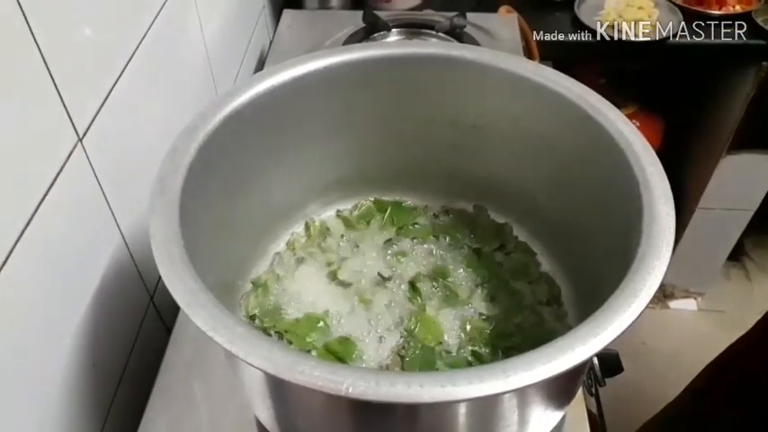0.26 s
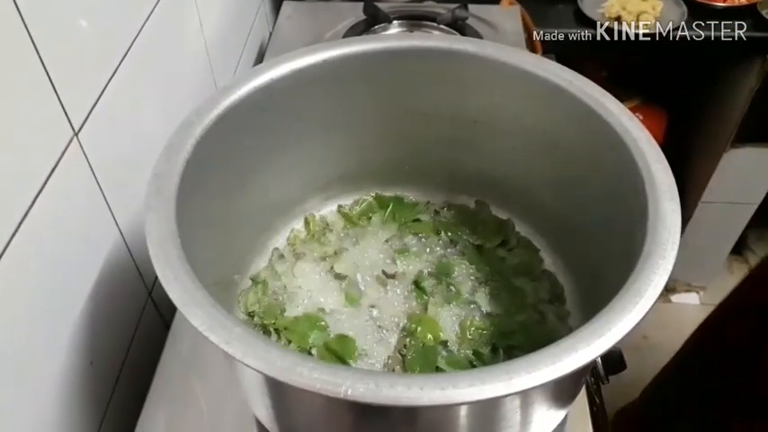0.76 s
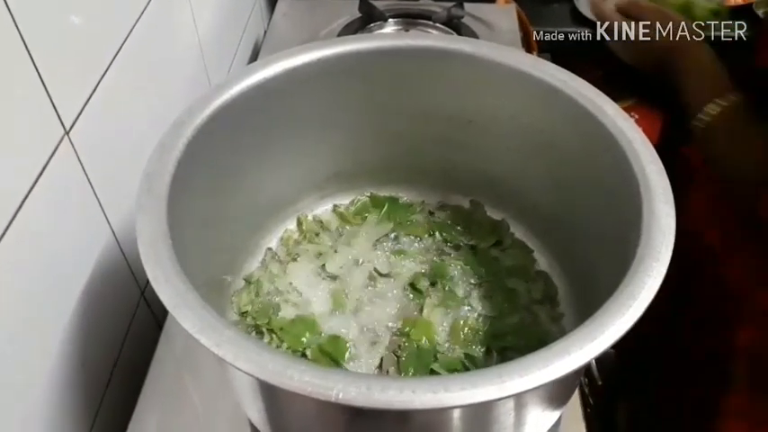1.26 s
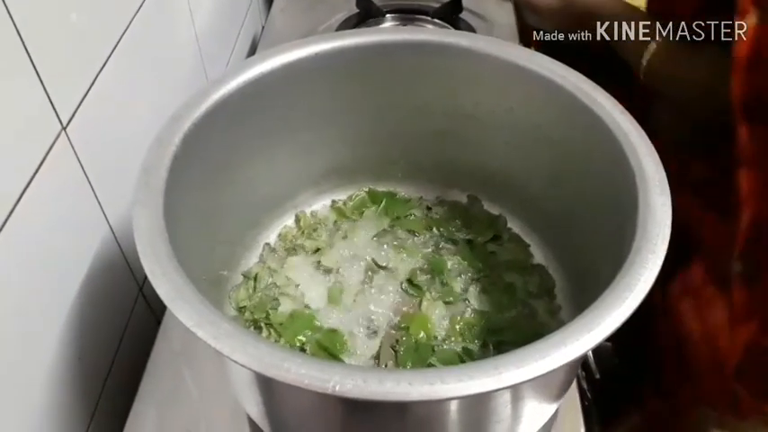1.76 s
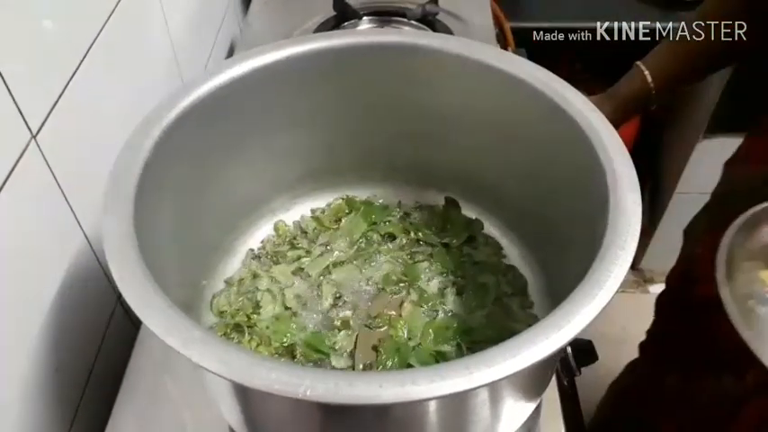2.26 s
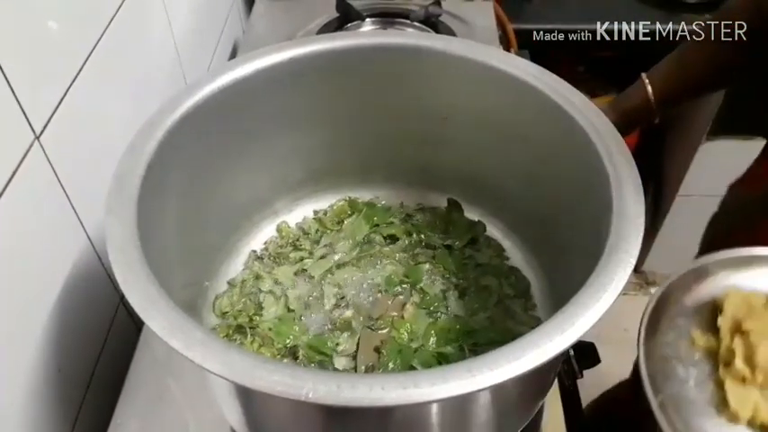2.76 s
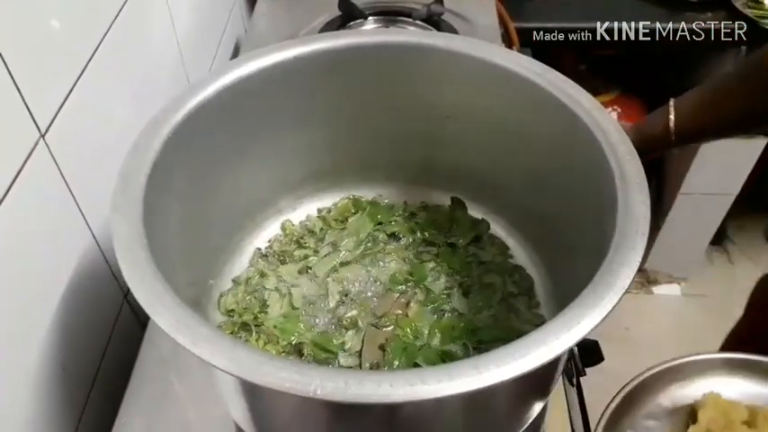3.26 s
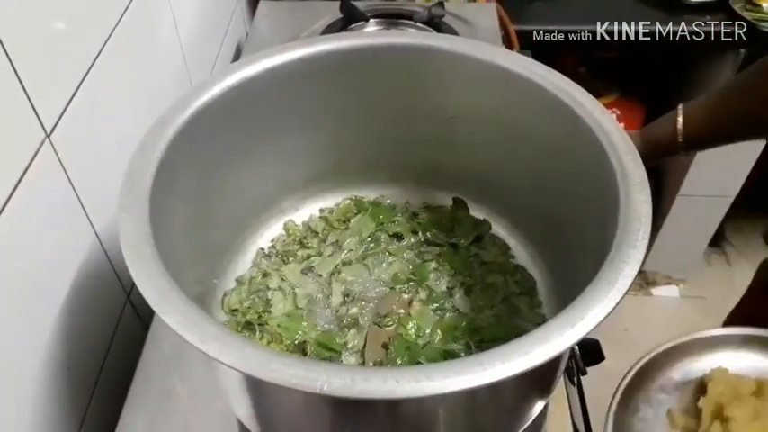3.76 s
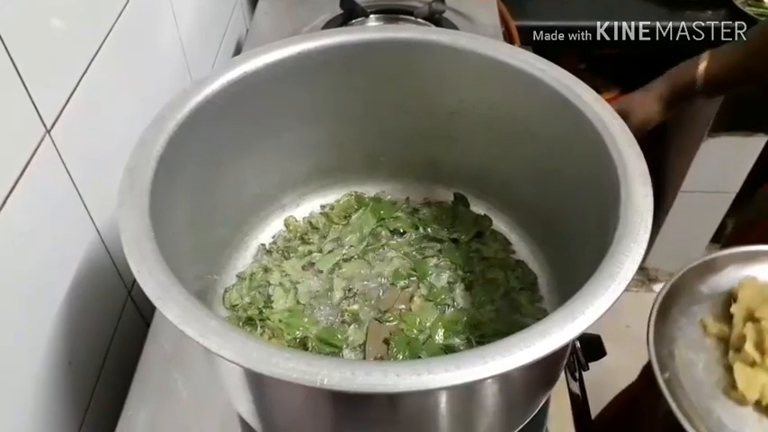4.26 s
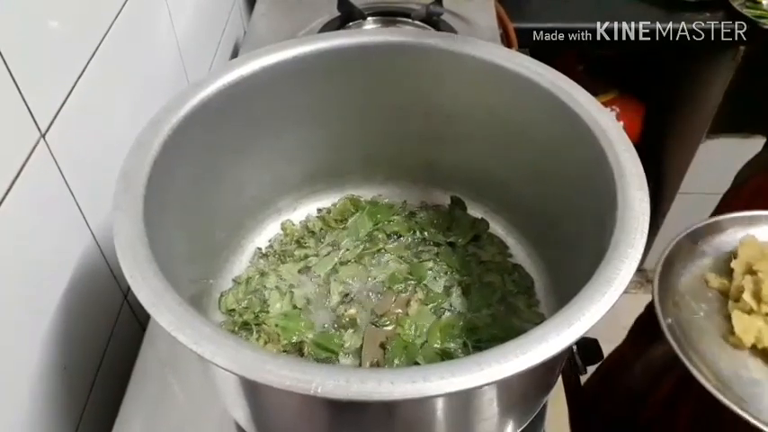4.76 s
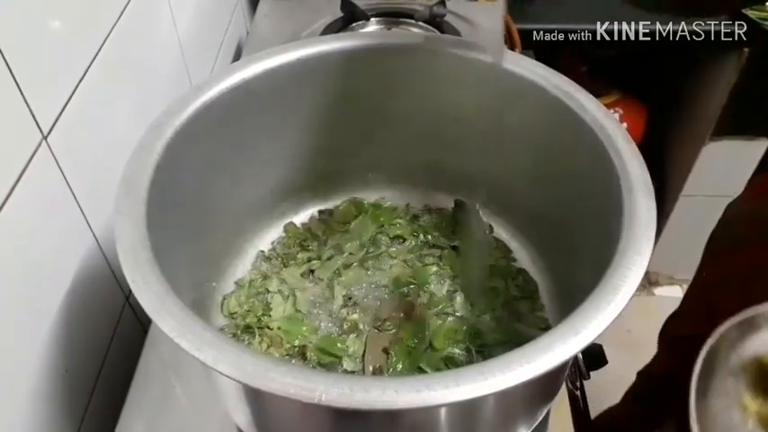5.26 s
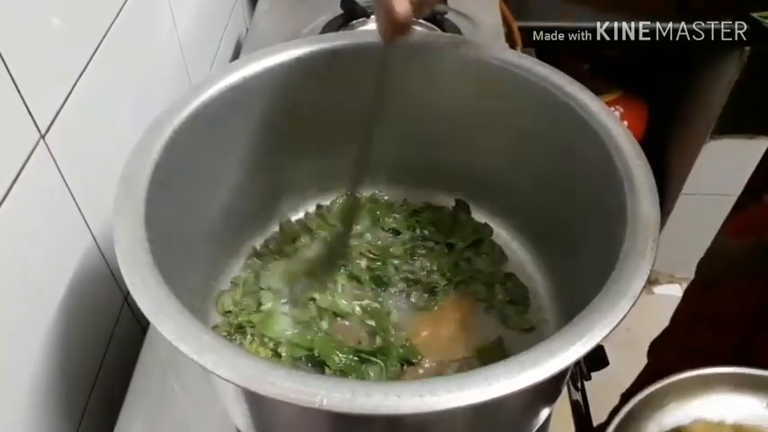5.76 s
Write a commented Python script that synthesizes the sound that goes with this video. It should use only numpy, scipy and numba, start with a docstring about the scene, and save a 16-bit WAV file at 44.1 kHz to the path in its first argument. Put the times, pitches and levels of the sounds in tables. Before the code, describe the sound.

Wet mint leaves foam and sizzle hard in hot oil in a deep metal pot, then sputter more quietly and unevenly, with ladle thuds at the end.

```python
"""Mint leaves fry in hot oil in a deep aluminium pot, heard from just above the rim.
The oil first foams, and the foam thickens: swarms of decaying sines make gurgle, simmer, fizz and crackle.
At 2.06 s the sound cuts to a later moment, a quieter, more uneven sputter of wilted leaves; 1 s on, bangles tinkle.
At 5.56 s a ladle brings paste: soft thuds, a short drag rumble, crackling turned leaves.
Noise-burst spits, ringing blisters and a faint burner rumble run throughout."""
import sys
import numpy as np
from scipy import signal
from scipy.fft import rfft, irfft
from scipy.io import wavfile
from numba import njit

SR = 44100
rng = np.random.default_rng(int(sys.argv[2]) if len(sys.argv) > 2 else 0)


def waveform_to_disk(signal):
    """Save audio, clipped to [-1, 1], as 16-bit WAV at the path in sys.argv[1]."""
    frames = np.transpose(np.atleast_2d(signal))
    scaled = np.clip(frames, -1, 1) * 32767
    samples = np.round(scaled).astype(np.int16)
    wavfile.write(sys.argv[1], SR, samples)


N = 265041
T = np.arange(N) / SR

# Colour of the boil in fresh foam, thick foam and wilted leaves. Each row: frequency in Hz, gain in dB.
FRESH_FOAM_COLOUR = [(440, -51), (750, -10), (900, -6), (1050, -2.5), (1300, -4), (1600, 0.5), (2540, -4),
                     (2950, -11), (3500, -9.5), (5500, -7), (6700, -10), (8500, -23), (9500, -18),
                     (12400, -54)]
THICK_FOAM_COLOUR = [(440, -38), (750, -10), (900, -2.5), (1020, 0.5), (1250, -3), (1600, 1.5),
                     (2040, -2.5), (2710, -7), (3930, 1.5), (5400, -2.5), (6080, -7.5), (7360, -8),
                     (9500, -14.5), (12400, -44)]
WILTED_LEAF_COLOUR = [(440, -48), (750, -14), (900, -6.5), (1100, -4.5), (1240, -6.5), (1450, -1.5),
                      (1830, -3.5), (2200, -7.5), (2700, -9.5), (4050, -2.5), (6000, -12.5), (7300, -13.5),
                      (9500, -24), (12400, -47)]
# Colour of big bubbles, finest crackle and a spitting drop. Each row: frequency in Hz, gain in dB.
GURGLE_COLOUR = [(30, -44), (100, -25), (165, -16), (230, -14.5), (320, -2.5), (450, -4), (620, -2.5),
                 (780, -3), (1100, 2), (3000, -68)]
CRACKLE_COLOUR = [(3000, -12.5), (7000, 9.5), (8500, -11.5), (10000, -5.5), (12500, -0.5), (14000, -3.5),
                  (15500, -2)]
SPIT_COLOUR = [(150, -47), (600, -15), (1500, -22), (4000, -6), (7000, 0), (9500, -11), (12500, -3),
               (15500, -5.5)]
# Resonances of the pot and its air. Each row: frequency in Hz, width in Hz, gain in dB.
POT_MODES = [(167, 10, 14), (334, 30, -1), (396, 12, -1), (464, 14, -1), (520, 12, -4), (589, 13, 4),
             (677, 14, 7), (893, 36, 1), (1132, 30, -9), (1399, 20, -2), (1700, 30, -11), (1872, 30, -11),
             (5550, 60, -5)]
# Spitting drops. Each row: start in seconds, treble peak in dB before gain and pot.
SPITS = [(0.026, -19.5), (0.1795, -20), (0.319, -13.5), (0.887, -12), (1.3453, -11), (1.4471, -15),
         (2.6686, -15), (2.8316, -21), (3.193, -18.5), (3.253, -20.5), (3.3686, -15), (3.5216, -16),
         (3.532, -14), (3.7653, -20.5), (4.0066, -15), (4.4007, -21), (4.837, -12.5), (5.0962, -17),
         (5.198, -22), (5.218, -22), (5.2586, -14), (5.6501, -15), (5.692, -11), (5.7104, -17),
         (5.7494, -9.5), (5.7544, -8)]
# Large blisters. Each row: start in seconds, peak in dB before gain, echoes and pot, pitch in Hz,
# cycles of ring to 1/e.
BLISTERS = [(0.965, -10, 954, 5.8), (1.9164, -5.5, 1953, 2.67), (1.9385, -3.5, 3994, 2.5),
            (2.838, -15, 1150, 1.9), (2.856, -13.5, 896, 2.05), (2.9338, -1, 4600, 6.5),
            (2.9793, -3, 4005, 1.12), (2.9824, -7.5, 4186, 12), (3.045, -15.5, 1061, 3.2),
            (3.057, -12, 3660, 6), (3.25, -11.5, 1093, 3.54), (3.331, -6.5, 4136, 4.9),
            (4.078, -18, 894.5, 6.4), (4.801, -9, 1589, 3.9), (4.821, -5, 1497, 1.57),
            (5.055, -2, 4320, 3.8), (5.18, -14, 911, 1.6), (5.409, -4, 3983, 2), (5.452, -10, 1512, 3.9),
            (5.641, -6, 1780, 2), (5.72, -12, 1080, 3), (5.757, -11, 1460, 2.7), (5.809, -7.5, 1698, 2.8),
            (5.8729, -4, 3700, 2.1), (5.8835, -6, 5210, 2.5)]
# Knocks of ladle and paste on the pot. Each row: start in seconds, level in dB before the soft onset, pitch in Hz.
KNOCKS = [(5.585, -47, 142), (5.629, -33, 130.8), (5.641, -30.5, 234.3), (5.74, -36, 160)]
# Steam spurts from under the leaves. Each row: time of crest in seconds, strength in dB,
# depth from 0 (simmers) to 1 (gurgles).
STEAM_SPURTS = [(.748, 3.5, 0), (1.11, 3.5, .2), (1.43, 3.5, 0.9), (2.335, 13, .65), (2.385, 9, 0.45),
                (2.64, 11, .7), (2.735, 5, .3), (2.762, 8, .5), (2.848, 14, .8), (2.888, 7, .75),
                (3.043, 11, .65), (3.19, 7.5, .5), (3.253, 7, 1), (3.345, 5, 0.18), (3.471, 6.5, 1),
                (3.75, 9, 0.67), (4.078, 10.5, .95), (4.152, 8, 0.59), (4.355, 5, .3), (4.42, 14, 0.78),
                (4.762, 6, .8), (4.81, 4, .2), (4.888, 8, 0.71), (4.955, 9, 0.64), (5.058, 12, 0.53),
                (5.186, 11, .8), (5.412, 10, 0.84), (5.641, 12, 0.51), (5.718, 12, .75)]
# Bangle partials. Each row: frequency in Hz before stretch, level in dB before touch and gain.
BANGLE_MODES = [(7300, -30), (8156, -50), (8592, -40), (10471, -43), (12882, -52), (13830, -43),
                (15256, -51)]
# Bangle touches. Each row: start in seconds, strength in dB before gain.
BANGLE_TOUCHES = [(3.063, 6.4), (3.072, 3), (3.084, 3), (3.097, 10.6), (3.106, 2.42)]
# Vigour of the boil, foaming and wilted. Each row: time in seconds, vigour in dB.
FOAMING_VIGOUR = [(0, 1), (.6, -1.22), (1.0, 0), (2.0, 1.5)]
WILTED_VIGOUR = [(2.07, -1.27), (2.55, -.7), (2.82, 2), (3.15, -1.5), (3.9, -2), (4.5, -0.03), (4.85, 1.5),
                 (5.7, 2), (6.0, 1.56)]
# Bubble sizes: gurgle, simmer, fizz, crackle. Each row: base level in foam in dB, base level among wilted
# leaves in dB, dB per dB of vigour, change in thick foam in dB, change when stirred in dB.
BUBBLE_SIZES = [(-32, -40.5, 1.01, 1, -0.5), (-21.5, -26.5, 1.03, 0.03, -3), (-20.5, -25, 1, 1.5, 0),
                (-33.5, -39, 1.05, -0.3, 3.5)]

CUT_S, THICKENS_S = 2.06, (0.49, 1.06)
SIMMER_BAND_HZ, FIZZ_BAND_HZ = (750, 2800), (2800, 8500)
SPURT_RISE_S, SPURT_FALL_S = .0085, .0145
SPURT_FIZZ_SHARE = .06  # part of a spurt's dB that reaches fizz and crackle
CROWD_SHARE = .25  # part of a rise in level made by more bubbles, the rest by louder ones
LADLE_S, STIR_S = 5.56, 0.28
DRAG_DB, DRAG_ATTACK_S, DRAG_FADE_DB_PER_S = -42.5, 0.064, 62
KNOCK_T60_S = .2
TOP_HZ = 15500


def boil(foam_sputter_db=0.41, wilted_sputter_db=0.9347, stirred_sputter_db=0.38, gain_db=-1.0, heave_db=0.56):
    """Four bubble sizes share a quick sputter, more uneven once wilted and stirred; the two bigger heave."""
    gurgle_db, simmer_db, fizz_db, crackle_db = boil_levels() + gain_db
    sputter_db = by_stage(foam_sputter_db, wilted_sputter_db) + stirred_sputter_db * stirring()
    shared_db = sputter_db * walk(130)
    simmer_activity_db = shared_db + 1.1 * sputter_db * walk(150)
    fizz_activity_db = .55 * shared_db + .6 * sputter_db * walk(140)

    gurgle = swarm(gurgle_db, 124, 882, per_s=1100, cycles=1.37, spread_db=2.5, activity_db=1.2 * shared_db)
    simmer = swarm(simmer_db, 766, 2634, per_s=3800, cycles=2.23, spread_db=4, activity_db=simmer_activity_db)
    fizz = swarm(fizz_db, 2670, 8380, per_s=8500, cycles=2.37, spread_db=3.5, activity_db=fizz_activity_db)
    crackle = swarm(crackle_db, 7840, 16700, per_s=5900, cycles=2.4, spread_db=4.5, activity_db=.7 * shared_db)

    swell_db = heave_db * walk(60)
    return (undb(gurgle_db + swell_db) * unit(colour(pot(gurgle), GURGLE_COLOUR))
            + undb(simmer_db + swell_db) * through_foam(pot(simmer), *SIMMER_BAND_HZ)
            + undb(fizz_db) * through_foam(pot(fizz), *FIZZ_BAND_HZ)
            + undb(crackle_db) * unit(colour(pot(crackle), CRACKLE_COLOUR)))


def boil_levels():
    """Levels in dB of the four bubble sizes: vigour drives all; foam, stirring and spurts shift the balance."""
    vigour_db, stirred = vigour(), stirring()
    thick = np.interp(T, THICKENS_S, (0, 1))
    levels_db = [by_stage(foam_db, wilted_db) + follow * vigour_db + thick * thick_db + stirred * stir_db
                 for foam_db, wilted_db, follow, thick_db, stir_db in BUBBLE_SIZES]
    return spurts() + np.array(levels_db)


def vigour():
    """How hard the oil boils, in dB."""
    foaming_db = np.interp(T, *np.transpose(FOAMING_VIGOUR))
    wilted_db = np.interp(T, *np.transpose(WILTED_VIGOUR))
    return by_stage(foaming_db, wilted_db)


def spurts():
    """Rise in dB of the four bubble sizes: each steam spurt swells quickly and dies away."""
    rise_db = np.zeros((4, N))
    for s, db, depth in STEAM_SPURTS:
        near = slice(*np.searchsorted(T, (s - 4 * SPURT_RISE_S, s + 4 * SPURT_FALL_S)))
        age = T[near] - s
        width_s = np.where(age < 0, SPURT_RISE_S, SPURT_FALL_S)
        swell = np.exp(-.5 * (age / width_s) ** 2)
        shares = (depth, 1 - depth, SPURT_FIZZ_SHARE, SPURT_FIZZ_SHARE)
        rise_db[:, near] += np.outer(shares, db * swell)
    return rise_db


def stirring():
    """How far the ladle has turned the leaves over, 0-1."""
    return np.clip((T - LADLE_S) / STIR_S, 0, 1)


def by_stage(foaming, wilted):
    """The sound cuts from foaming oil to a later moment with wilted leaves."""
    return np.where(T < CUT_S, foaming, wilted)


def swarm(level_db, lo_hz, hi_hz, per_s, cycles, spread_db, activity_db):
    """Bubbles with level_db's rise levelled out: crowded where the boil is loud, sparse where quiet."""
    crowd_db = CROWD_SHARE * level_db
    crowded = bubbles(lo_hz, hi_hz, per_s, cycles, spread_db, activity_db + crowd_db)
    return unit(crowded / undb(crowd_db))


def bubbles(lo_hz, hi_hz, per_s, cycles, spread_db, activity_db, echo_db=-8, echo_s=.006, count=3):
    """A swarm of bubbles, many weak and few strong, that come thicker when the boil is active."""
    when, pitch, life, strength, sign = rng.random((int(per_s * N / SR), 5)).T
    births = np.cumsum(undb(2 * activity_db))  # birth rate follows power
    starts = np.searchsorted(births, when * births[-1])
    size = undb(-spread_db * np.log(strength + .004)) * np.sign(sign - .5)
    hz = lo_hz + (hi_hz - lo_hz) * pitch
    lengths = cycles * (.5 + life)
    out = ring(starts, hz, lengths, size)
    # each bubble has its own paths off the pot's wall
    for _ in range(count):
        delay_s = 0.000999 + echo_s * rng.exponential(size=len(starts))
        lags = (SR * delay_s).astype(np.int64)
        out += ring(starts + lags, hz, lengths, size * undb(echo_db))
    return unit(out)


@njit
def ring(starts, hz, cycles, size):
    """Each bubble is a sine that dies by 1/e in the given number of cycles; size sets its energy."""
    out = np.zeros(N)
    for k in range(len(starts)):
        life = cycles[k] * SR / hz[k]  # samples
        pole = np.exp(2j * np.pi * hz[k] / SR - 1 / life)
        z = size[k] / np.sqrt(life) + 0j
        for i in range(starts[k], min(N, starts[k] + int(6 * life))):
            out[i] += z.imag
            z *= pole
    return out


def through_foam(x, lo_hz, hi_hz):
    """The cover of foam and leaves colours the bubbles under it; each colour has rms 1 in the given band."""
    covers = (FRESH_FOAM_COLOUR, THICK_FOAM_COLOUR, WILTED_LEAF_COLOUR)
    coloured = [colour(x, points) for points in covers]
    fresh, thick, wilted = [v / np.std(band(v, lo_hz, hi_hz)) for v in coloured]
    share = np.interp(T, THICKENS_S, (0, 1))
    return by_stage((1 - share) * fresh + share * thick, wilted)


def spits(gain_db=-0.5, stray_db=-24.5, stray_spread_db=1.5, count=44):
    """A drop of water flashes to steam with a sharp, bright crack; fainter ones go off at random."""
    out, t = np.zeros(N), T[:1024]
    fade = undb(-60 * t / .003)
    strays = [(rng.random() * T[-1], stray_db + stray_spread_db * rng.standard_normal()) for _ in range(count)]
    for s, db in list(SPITS) + strays:
        crack = colour(rng.standard_normal(len(t)) * fade, SPIT_COLOUR)
        crack = crack / np.abs(band(crack, 9000, TOP_HZ)).max()
        add(out, s, walls(undb(db + gain_db) * crack, echo_db=-6.5, t60_s=0.027))
    return pot(out)


def pops(opening_cycles=0.65, gain_db=-3.5):
    """A large blister opens and rings for a few cycles."""
    out, t = np.zeros(N), T[:2048]
    for s, db, hz, cycles in BLISTERS:
        turns = hz * t
        opening = 1 - np.exp(-turns / opening_cycles)
        ping = np.sin(2 * np.pi * turns) * np.exp(-turns / cycles) * opening
        add(out, s, walls(undb(db + gain_db) * ping / np.abs(ping).max(), echo_db=-17, t60_s=0.05))
    return pot(out)


def ladle(contact_s=0.0057):
    """Cushioned by paste and leaves, the ladle only thuds and rumbles on the pot's base."""
    age = T - LADLE_S
    fade_db = DRAG_FADE_DB_PER_S * np.maximum(age - DRAG_ATTACK_S, 0)
    drag = np.clip(age / DRAG_ATTACK_S, 0, 1) * undb(DRAG_DB - fade_db)
    out = drag * unit(band(rng.standard_normal(N), 70, 220))
    t = T[:SR // 2]
    onset = 1 - np.exp(-t / contact_s)
    for s, db, hz in KNOCKS:
        add(out, s, np.sin(2 * np.pi * hz * t) * undb(db - 60 * t / KNOCK_T60_S) * onset)
    return out


def turned_leaves(crackle_db=-33, onset_s=0.1):
    """Wet leaves that the ladle turns onto the hot metal crackle sharply."""
    snaps = bubbles(3900, 8300, per_s=600, cycles=2.0, spread_db=4.2, activity_db=2 * walk(40))
    onset = np.clip((T - LADLE_S) / onset_s, 0, 1)
    return undb(crackle_db) * onset * unit(band(pot(snaps), 1500, 9400))


def bangles(gain_db=-3):
    """Thin rings of slightly different sizes touch on the cook's wrist and ring briefly."""
    out, t = np.zeros(N), T[:SR // 5]
    fade = undb(-60 * t / .06)
    for s, touch_db in BANGLE_TOUCHES:
        stretch = 1 + .04 * rng.standard_normal()
        partials = sum(undb(db) * np.sin(2 * np.pi * (stretch * hz * t + rng.random()))
                       for hz, db in BANGLE_MODES)
        add(out, s, undb(touch_db + gain_db) * partials * fade)
    return out


def burner(rumble_db=-73):
    """The gas flame rumbles faintly under the pot, wandering about 1 dB around its level."""
    return undb(rumble_db + walk(6)) * unit(band(rng.standard_normal(N), 55, 125))


def walls(sound, echo_db, t60_s):
    """Quick, dense echoes inside the pot, different for every spot."""
    t = T[:SR // 10]
    tail = rng.standard_normal(len(t)) * undb(-60 * t / t60_s) * (t > .001)
    response = undb(echo_db) * tail / np.linalg.norm(tail)
    response[0] = 1  # direct sound
    return signal.fftconvolve(sound, response)


def pot(x, kitchen_db=-16, kitchen_t60_s=0.2):
    """Direct sound, the resonances of the pot and its air, and a faint echo of the tiled kitchen."""
    t = T[:SR // 3]
    response = sum(undb(db) * 2 * np.pi * width / SR * np.exp(-np.pi * width * t) * np.cos(2 * np.pi * hz * t)
                   for hz, width, db in POT_MODES)
    response[0] += 1  # direct sound
    tail = rng.standard_normal(len(t)) * undb(-60 * t / kitchen_t60_s) * (t > .004)
    echo = undb(kitchen_db) * tail / np.linalg.norm(tail)
    return signal.fftconvolve(x, response + echo)[:N]


def undb(db):
    """Decibels to gain."""
    return 10 ** (np.asarray(db) / 20)


def band(x, lo_hz, hi_hz):
    """The part of x between two frequencies."""
    return signal.sosfilt(signal.butter(4, [lo_hz, hi_hz], "band", fs=SR, output="sos"), x)


def unit(x):
    """Scale to rms 1."""
    return x / np.std(x)


def colour(x, points):
    """Causal filter through (Hz, dB) points, built from the cepstrum of its gain."""
    size = 4096
    hz, db = np.transpose(points)
    bins_hz = np.arange(size // 2 + 1) * SR / size
    gain = undb(np.interp(np.log(bins_hz + 1), np.log(hz), db))
    cepstrum = irfft(np.log(gain))[:size // 2]
    cepstrum[1:] *= 2  # fold to minimum phase
    response = irfft(np.exp(rfft(cepstrum, size)))
    return signal.fftconvolve(x, response)[:len(x)]


def walk(rate_per_s):
    """Random line with a new knot rate_per_s times a second; standard deviation 1."""
    knots_s = np.arange(0, T[-1] + 1, 1 / rate_per_s)
    return unit(np.interp(T, knots_s, rng.standard_normal(len(knots_s))))


def add(out, s, sound):
    """Mix a short sound in at time s."""
    start = int(np.clip(s * SR, 0, N - 1))
    out[start:start + len(sound)] += sound[:N - start]


def scene():
    """All sources sum to one channel above the pot."""
    return (boil() + spits() + pops() + ladle() + turned_leaves() + bangles() + burner())[None]


def record(dry):
    """A steep low-pass cuts the top of the treble."""
    return signal.sosfilt(signal.ellip(10, .2, 80, TOP_HZ, fs=SR, output="sos"), dry)


dry = scene()
out = record(dry)
waveform_to_disk(out)
```